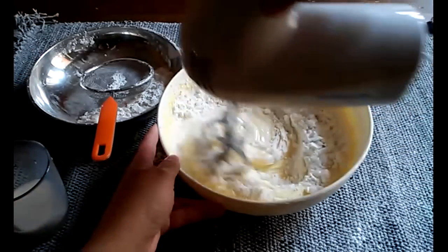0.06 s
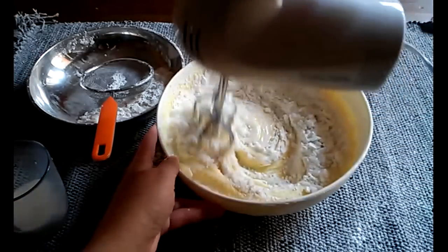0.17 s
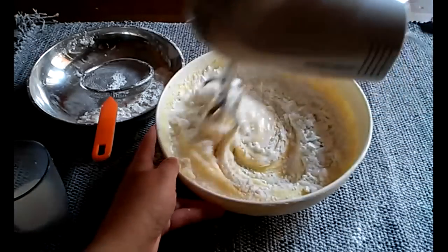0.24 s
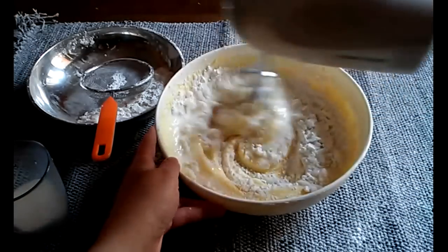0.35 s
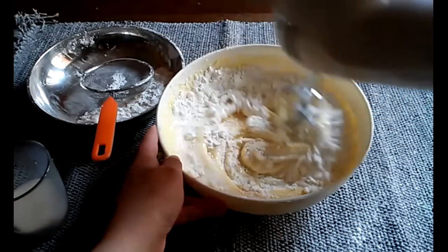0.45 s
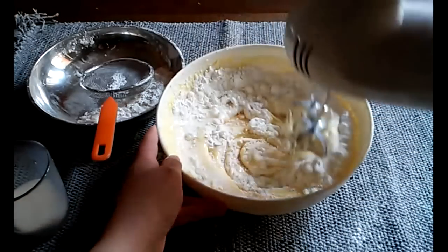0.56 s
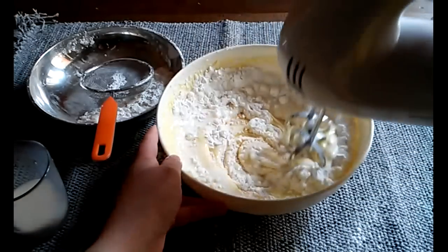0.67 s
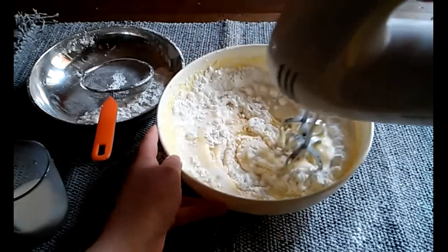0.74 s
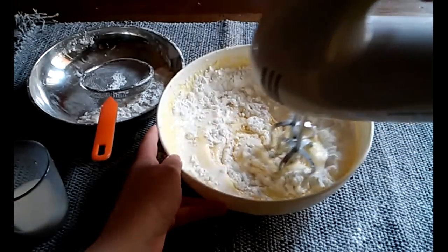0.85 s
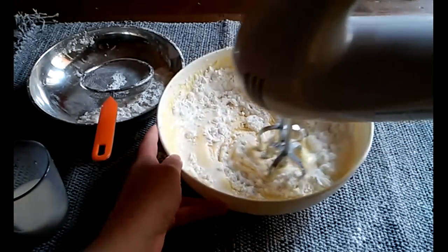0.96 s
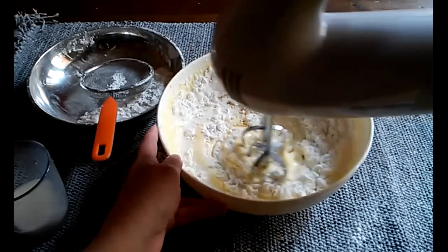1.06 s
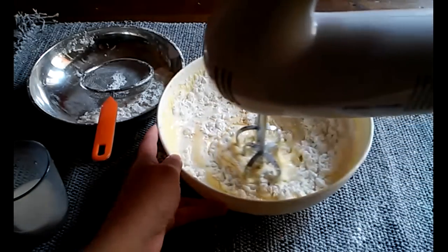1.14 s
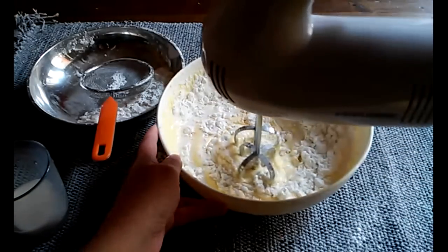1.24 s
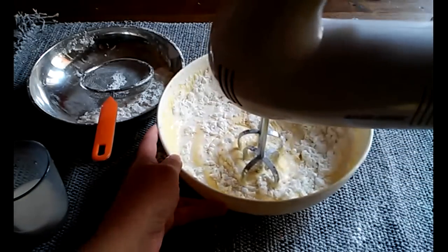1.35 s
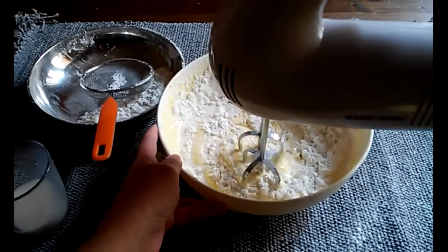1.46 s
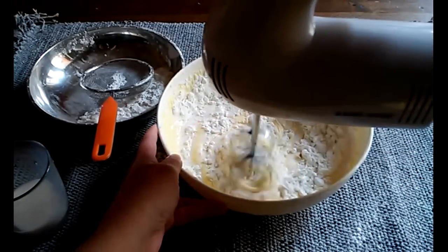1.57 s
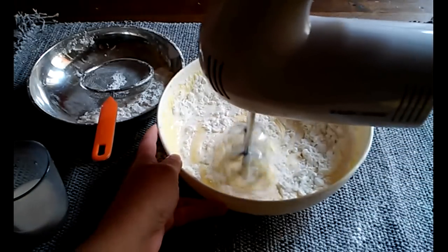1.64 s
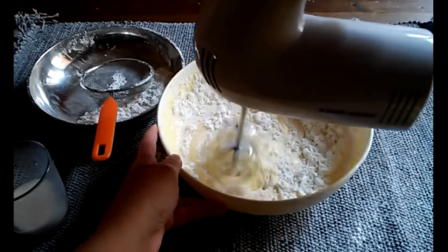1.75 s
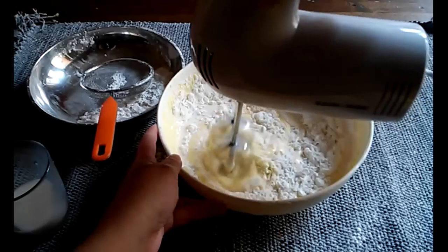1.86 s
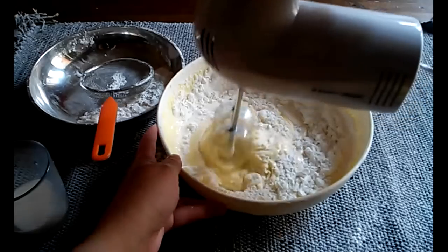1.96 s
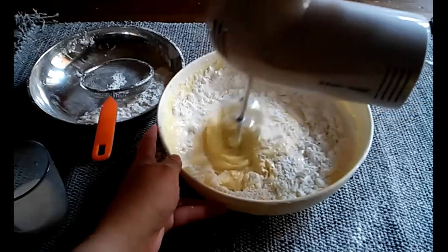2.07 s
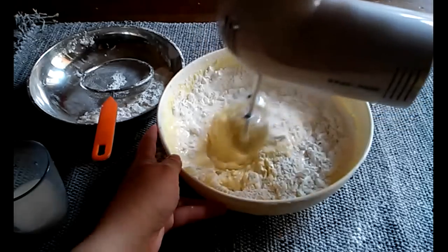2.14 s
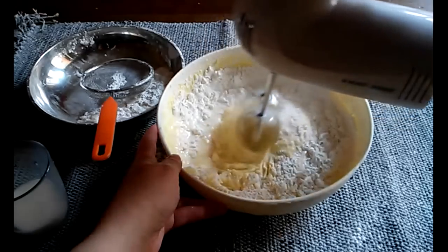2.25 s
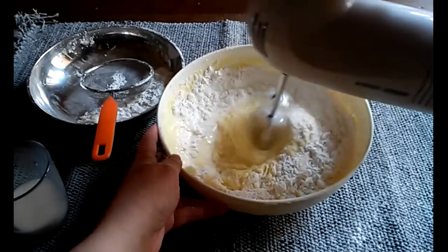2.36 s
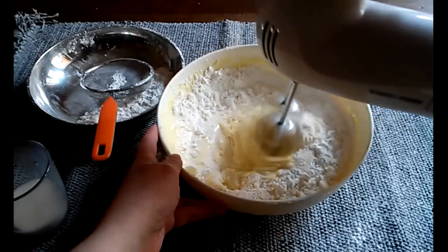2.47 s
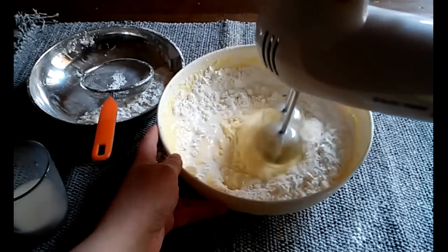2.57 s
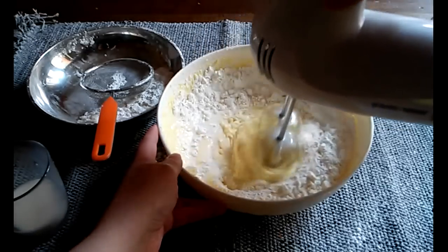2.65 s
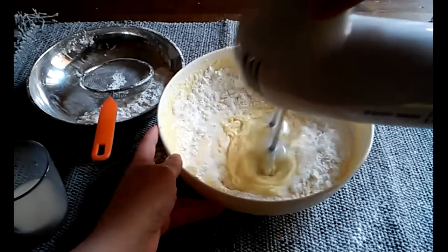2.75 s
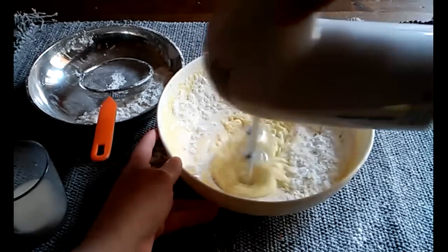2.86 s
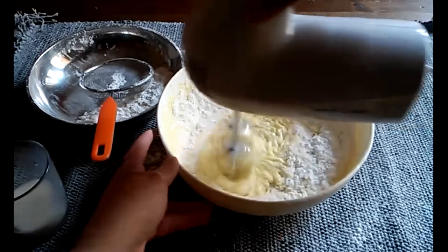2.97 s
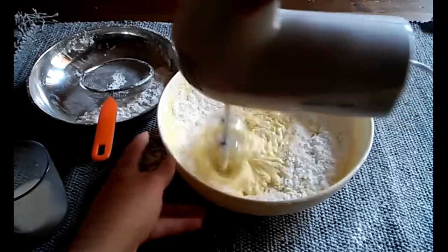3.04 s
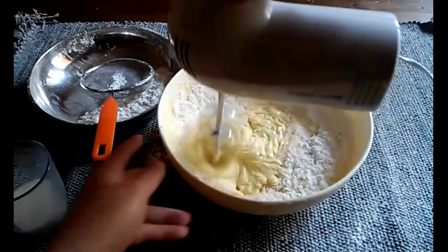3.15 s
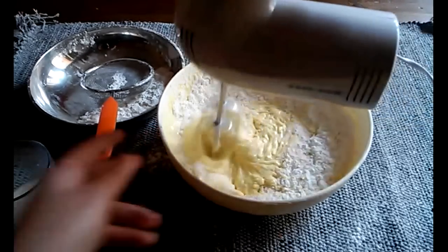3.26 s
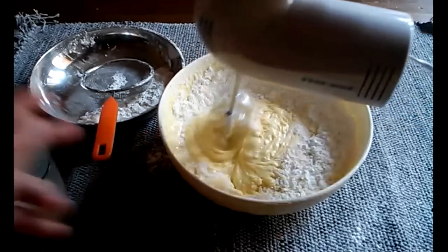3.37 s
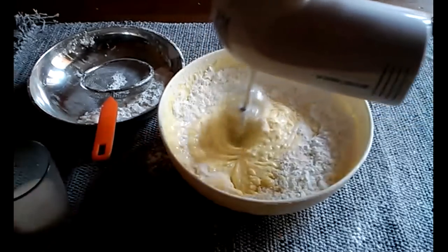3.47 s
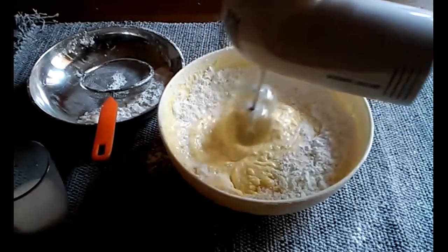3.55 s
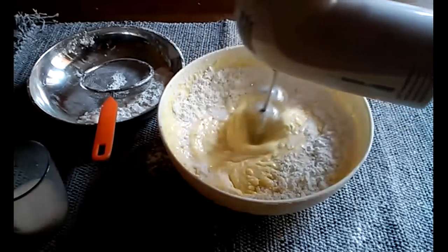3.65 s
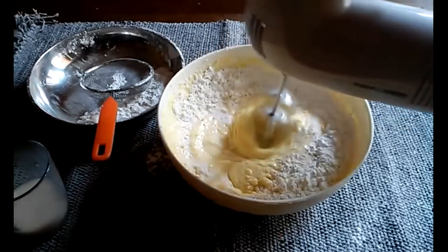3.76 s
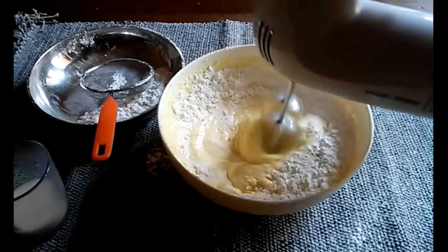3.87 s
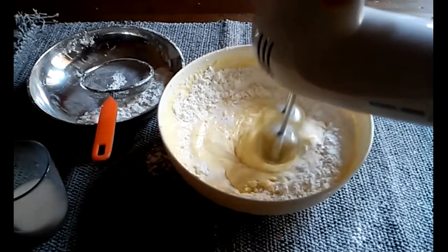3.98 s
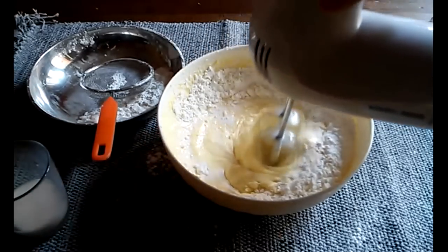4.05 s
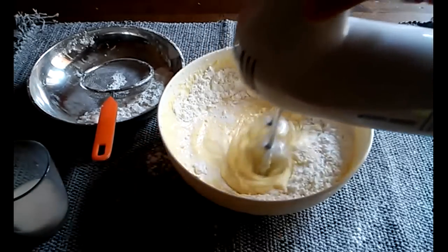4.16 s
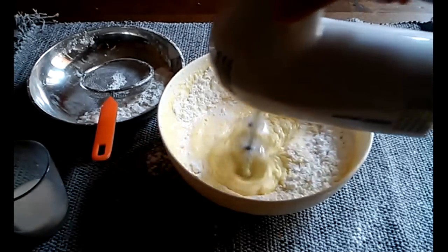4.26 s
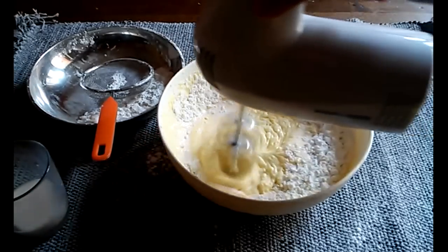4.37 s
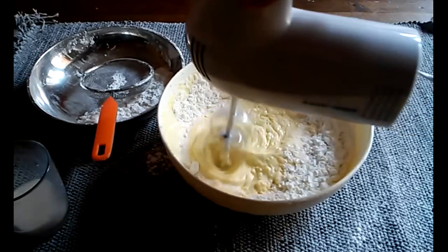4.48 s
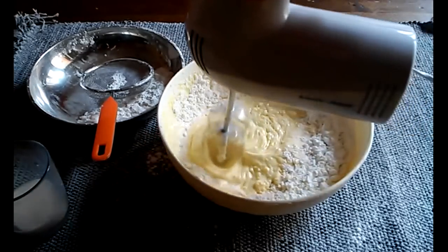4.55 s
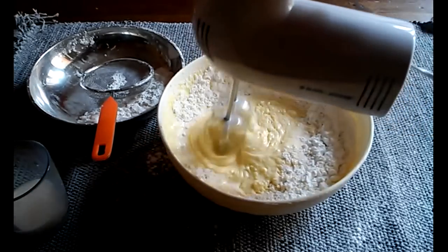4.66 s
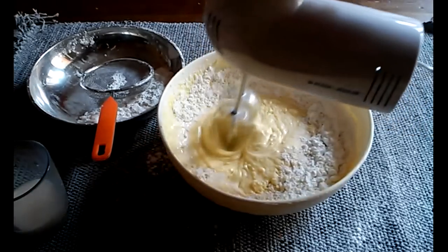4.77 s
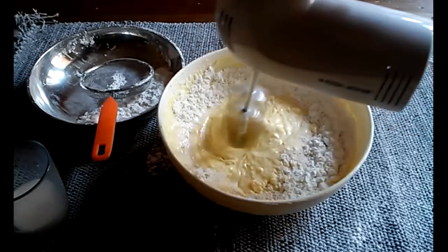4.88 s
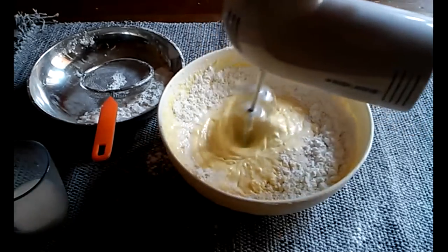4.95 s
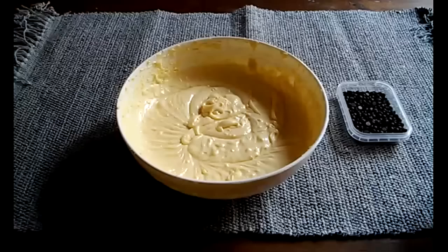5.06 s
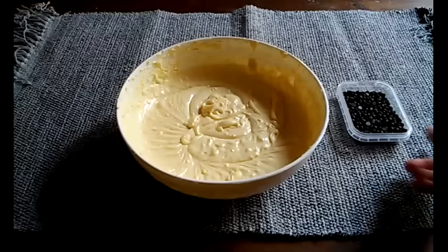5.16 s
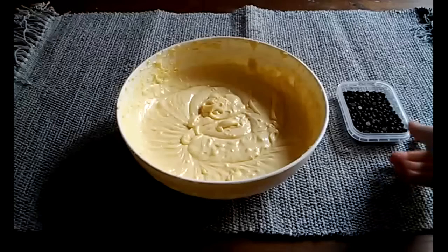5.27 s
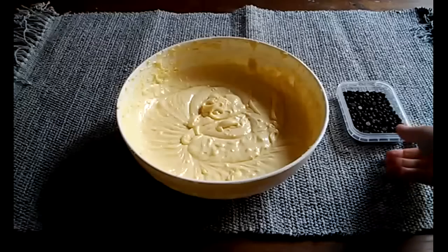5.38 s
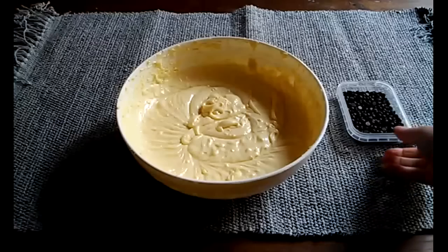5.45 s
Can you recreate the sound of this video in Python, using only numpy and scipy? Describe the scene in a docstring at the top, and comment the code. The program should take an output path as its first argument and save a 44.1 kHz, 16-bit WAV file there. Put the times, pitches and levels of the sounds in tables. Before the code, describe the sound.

A quiet home kitchen with a very faint hum and tiny rustles. A hard plastic switch click, a quick rattle of gear clacks, and a hand mixer spins up within half a second to a throbbing electric whine with bright fan hiss and gear rattle. The pitch sags and recovers in the batter; midway the beaters knock rapidly on the bowl. It is cut off abruptly, leaving quiet room tone. Close, dry microphone.

```python
"""Faint rustles and a far hum in a quiet kitchen, then the click of a switch: a hand mixer spins up in thick batter.
Its mains motor whines on the rotor slots, throbbing with the current; one shaft speed also drives
shaft tones, fan hiss and gear rattle, which are coloured noise. Struck modes make the switch, the gear clacks
and the beaters' knocks on the bowl. The mixer is cut off in a quick fade; the kitchen stays."""
import sys
import numpy as np
from scipy import signal
from scipy.fft import rfft, irfft, next_fast_len
from scipy.io import wavfile
from scipy.ndimage import uniform_filter1d

SR = 44100
rng = np.random.default_rng(int(sys.argv[2]) if len(sys.argv) > 2 else 0)


def to_wav(s):
    """Save 16-bit WAV."""
    ch = np.atleast_2d(s).T  # columns
    pcm = np.round(np.clip(ch, -1, 1) * 32767)  # PCM
    wavfile.write(sys.argv[1], SR, pcm.astype(np.int16))


N = 243315
T = np.arange(N) / SR  # s

# Mixer levels before the casing, as it is led round the bowl.
# Each row: time in seconds, slot whine in dB, sharpness of its throb (no unit),
# lower fan hiss in dB at the reference speed, gear rattle in dB.
MIXER_LEVELS = [(1.6, -13.5, 1.4, -22, -29), (1.69, -20.5, 2.2, -36, -27.5),
                (1.8, -15.5, 0.62, -31.5, -28.5), (1.9, -18, 1.2, -29.5, -30.5), (2.0, -17, 1.6, -26, -26),
                (2.3, -15.5, 1.2, -24, -27), (2.62, -17.5, 1.15, -27, -25.5),
                (2.9, -18.5, 1.5, -24.5, -25.5), (3.1, -14.5, 1.1, -22, -25), (3.55, -17, 1.25, -24.5, -25),
                (3.78, -14.5, 1.3, -25, -24.5), (3.95, -15, 1.9, -27, -25), (4.25, -21, 1.0, -24, -23.5),
                (4.42, -17, 1.1, -23.5, -23), (4.62, -17.5, 2.1, -22.5, -23.5),
                (4.78, -21.5, 3, -23, -23.5), (5.08, -27, 2.3, -23, -24)]
REFERENCE_SPEED_HZ = 210
NOISE_FULL_S, NOISE_RISE_DB_PER_S = 1.6, 246


def motor():
    """Whine, shaft tones, fan, gears and shaking bowl all follow one shaft."""
    speed, spun_up = shaft_speed()
    speed_db = 20 * np.log10(speed / REFERENCE_SPEED_HZ)
    turns = np.cumsum(speed * (1 + .0004 * drift(.03))) / SR
    whine_db, sharpness, lower_hiss_db, rattle_db = columns(MIXER_LEVELS)
    start_db = rising(NOISE_FULL_S, NOISE_RISE_DB_PER_S)
    tones = slot_whine(speed, turns, whine_db, sharpness) + whistle(turns)
    tones = tones + shaft_tones(speed, turns, speed_db) * spun_up ** 2.6
    air_and_gears = fan(speed, speed_db, lower_hiss_db, start_db) + gears(speed, rattle_db + start_db)
    running = np.clip((T - 1.524) / .02, 0, 1)
    return running * (np.sqrt(2) * tones + .53 * casing(air_and_gears, flat=1.492) + bowl_shake(speed))


# Speed the shaft strives for, sagging and recovering with the load of the batter.
# Each row: time in seconds, speed in turns per second (Hz).
LOADED_SPEED = [(1.76, 204.2), (1.88, 198.5), (1.99, 199.8), (2.1, 205), (2.21, 205.2), (2.5, 197),
                (2.62, 199), (2.8, 205.8), (3.1, 208.7), (3.4, 214.4), (3.52, 214.6), (3.78, 207.8),
                (3.92, 206.3), (4.06, 208.4), (4.3, 213.8), (4.62, 217.8), (4.85, 221.5), (5.08, 219.3)]
ON_S, SPIN_UP_S = 1.505, .19  # start, time constant


def shaft_speed():
    """The rotor nears the loaded speed exponentially; returns turns per second and share spun up."""
    spun_up = 1 - np.exp(-np.maximum(T - ON_S, .001) / SPIN_UP_S)
    speed = uniform_filter1d(columns(LOADED_SPEED)[0], size=2500) * spun_up
    return speed, spun_up


# How well the casing radiates the whine as it climbs.
# Each row: whine pitch in Hz, gain in dB.
WHINE_RADIATED = [(300, -36.5), (850, -19.5), (1030, -3.5), (1200, -4.5), (1400, -3.5), (1610, -17),
                  (1720, -4.5), (1900, 0)]
# Resonances that overtones of the whine sweep through.
# Each row: multiple of the slot pitch, centre in Hz, width in Hz, level in dB.
OVERTONE_PEAKS = [(2, 1680, 450, -26.5), (2, 2703, 360, -21), (2, 3200, 660, -40), (3, 6400, 810, -21)]
SLOTS = 12
MAINS_THROB_HZ, THROB_PEAK_S = 99.93, .0011


def slot_whine(speed, turns, level_db, sharpness):
    """Rotor slots passing the poles whine; magnetic pull peaks twice in every mains cycle."""
    pitch_hz = SLOTS * speed
    slot_phase = 2 * np.pi * SLOTS * turns
    pull = np.cos(2 * np.pi * MAINS_THROB_HZ * (T - THROB_PEAK_S))
    throb = np.exp(sharpness * pull) / np.sqrt(np.i0(2 * sharpness))  # Bessel term keeps rms at 1
    ripple_rad = -.6 * pull  # each pull speeds the rotor: pitch rises through every throb
    jitter_rad = .08 * drift(.004)
    radiated_db = np.interp(pitch_hz, *np.transpose(WHINE_RADIATED))
    whine_gain = gain_of(level_db + radiated_db - 3.5 + 1.2 * drift(.02))
    whine = whine_gain * throb * np.cos(slot_phase + ripple_rad + jitter_rad)
    overtones = np.zeros(N)
    for multiple, hz, width_hz, db in OVERTONE_PEAKS:
        swell = gain_of(db) * peak(multiple * pitch_hz, hz, width_hz, order=4)
        overtones += swell * np.cos(multiple * slot_phase)
    whine = casing(whine + throb ** .5 * overtones, flat=.54)
    # echo off the table: its path changes as the mixer moves, tilting the throbbing partials
    echo_s = .004 + .0002 * drift(.3)
    return whine + .35 * np.interp(T - echo_s, T, whine)


# Harmonics of the shaft that sound. Each entry: multiple of the shaft speed.
SHAFT_ORDERS = [1, 2, 3, 4, 5, 6, 9]
# Resonances that shaft tones swell in as the speed carries them through.
# Each row: centre in Hz, width in Hz, level in dB.
SHAFT_PEAKS = [(199, 50, -41.5), (376, 42, -35), (431.7, 14, -38.5), (614, 70, -45), (695, 35, -36),
               (779, 14, -45.5), (838, 23, -41.5), (990, 40, -38.5), (1059, 26, -40), (1110, 20, -39),
               (1184, 50, -35.5), (1233, 30, -37.5), (1760, 70, -34), (1888, 80, -35.5)]
SHAFT_FLOOR_DB = -50  # at the reference speed


def shaft_tones(speed, turns, speed_db):
    """Unbalance sounds at the shaft speed; higher orders flutter more, at random."""
    tones = np.zeros(N)
    for order in SHAFT_ORDERS:
        level = gain_of(SHAFT_FLOOR_DB + speed_db)
        for hz, width_hz, db in SHAFT_PEAKS:
            level = level + gain_of(db) * peak(order * speed, hz, width_hz, order=4)
        flutter_db = (1.5 if order == 1 else 3.) * drift(.02)
        tones += level * gain_of(flutter_db) * np.cos(2 * np.pi * (order * turns + rng.random()))
    return tones


# A fuzzy whistle comes and goes. Each row: time in seconds, level in dB.
WHISTLE = [(2.3, -53), (2.72, -28), (3.0, -32), (4.1, -42), (4.3, -30), (4.7, -34), (4.95, -36),
           (5.08, -43)]
WHISTLE_ORDER = 26


def whistle(turns):
    """Random amplitude blurs a shaft harmonic into a narrow band."""
    return gain_of(columns(WHISTLE)[0]) * drift(.002) * np.cos(2 * np.pi * WHISTLE_ORDER * turns)


# Colour of the fan hiss, before levelling. Each row: frequency in Hz, relative density in dB per Hz.
HISS_COLOUR = [(1650, -42), (2800, -6), (3430, -5.5), (3750, -3), (4240, -9.5), (4630, -6), (6110, -2.5),
               (7490, 5), (10000, -9), (14400, -21.5), (16000, -20.5)]
HISS_DB = -20.5  # upper band, before the casing, at the reference speed
HISS_POWER, LOWER_HISS_POWER = 1.6, 2.04  # power of the speed that each band follows


def fan(speed, speed_db, lower_hiss_db, start_db):
    """Air noise in two bands grows with the speed, its top opening last."""
    air = noise(HISS_COLOUR, 1.9, ticks=.18)
    lower = below(air, 5760)
    upper_hiss = gain_of(HISS_DB + HISS_POWER * speed_db) * evened(air - lower)
    lower_hiss = gain_of(lower_hiss_db + LOWER_HISS_POWER * speed_db) * evened(lower)
    hiss = gain_of(start_db) * (upper_hiss + lower_hiss)
    closed = np.clip(.9 - (speed / 200) ** 2.1, 0, .7)
    return hiss - (hiss - below(hiss, 9500)) * closed


# Colour of the gear rattle, before levelling. Each row: frequency in Hz, relative density in dB per Hz.
RATTLE_COLOUR = [(12, -55), (20, -31), (119, -22), (211, -10), (256, -10), (549, -8), (637, -6.5),
                 (755, -11.5), (1130, -4), (2140, -3.5), (2480, -0.5), (3200, -48), (4160, -45.5),
                 (7040, -120)]


def gears(speed, level_db):
    """Gear rattle is patchy ticking noise, thin while slow: its low part grows with speed."""
    rattle = noise(RATTLE_COLOUR, 2.5, ticks=.17)
    thinned = np.clip(1.2 - (speed / 170) ** 3., 0, .9)
    rattle = rattle - below(rattle, 650) * thinned
    return gain_of(level_db + .34 * drift(.024)) * rattle


# Modes of the plastic shell. Each row: frequency in Hz, width in Hz, gain in dB.
CASING_MODES = [(1152, 52, -1.5), (1486, 95, 1.5), (1740, 120, 0), (1867, 40, 5), (2280, 220, -15.5),
                (2671, 170, 1), (3254, 100, 0.5), (3690, 87, -10), (4575, 260, 4), (5610, 98, -1.5),
                (6300, 530, -5.5)]


def casing(x, flat):
    """The plastic shell lifts its modes over a flat share."""
    size = next_fast_len(N)
    hz = np.fft.rfftfreq(size, 1 / SR)
    gain = flat + sum(gain_of(db) * peak(hz, f, width_hz) for f, width_hz, db in CASING_MODES)
    return irfft(rfft(x, size) * gain, size)[:N]


# Colour of the shaking bowl, before levelling. Each row: frequency in Hz, relative density in dB per Hz.
SHAKE_COLOUR = [(30, -21.5), (60, -10.5), (85, -10.5), (115, 4), (150, 6.5), (220, -24)]
# Beaters hit the bowl; the first row is a clack as the gears take up slack.
# Each row: time in seconds, peak in dB.
KNOCKS = [(1.591, -29.5), (2.931, -21), (2.959, -24), (2.99, -23.5), (3.023, -14), (3.054, -18.5),
          (3.078, -20.5), (3.111, -23.5), (3.134, -20), (3.163, -18), (3.188, -24), (3.234, -19),
          (3.249, -31.5)]
SHAKE_DB, SHAKE_PEAK_HZ, SHAKE_WIDTH_HZ, SHAKE_PEAK_DB = -66.5, 143, 40, -36.5
KNOCK_SHAKE_DB, KNOCK_SHAKE_S = -34.5, .06  # relative to the knock, half-width to 1/e


def bowl_shake(speed):
    """The bowl shakes on the table: always a little, more at its resonance and under each row of KNOCKS."""
    shaking = gain_of(SHAKE_DB) + gain_of(SHAKE_PEAK_DB) * peak(speed, SHAKE_PEAK_HZ, SHAKE_WIDTH_HZ)
    for s, db in KNOCKS:
        shaking = shaking + gain_of(db + KNOCK_SHAKE_DB) * np.exp(-((T - s) / KNOCK_SHAKE_S) ** 2)
    return shaking * gain_of(2.2 * drift(.014)) * noise(SHAKE_COLOUR, 2.0)


# Modes rung by the knocks and the first clack.
# Each row: frequency in Hz, relative level in dB, 60 dB decay in seconds.
BOWL_MODES = [(107, -11, 0.23), (306, -5.5, .06), (560, -3, 0.12), (617, 3.5, 0.066), (1050, -7.5, .08),
              (1250, -1.5, 0.089), (1404, -1.5, 0.1)]


def knocks_and_first_clack():
    """A gear clack, then the beaters striking the bowl, ring the same low modes."""
    return struck(KNOCKS, BOWL_MODES, rise_s=.00079, crack=.27)


# Clicks of the switch. Each row: time in seconds, peak in dB.
SWITCH_CLICKS = [(1.4975, -44.5), (1.5008, -23.5), (1.5385, -31.5), (1.5412, -9)]
# The gears take up their slack. Each row: time in seconds, peak in dB.
GEAR_CLACKS = [(1.5928, -20), (1.6054, -16.5), (1.6224, -20.5)]
# Modes rung by both. Each row: frequency in Hz, relative level in dB, 60 dB decay in seconds.
SWITCH_MODES = [(1130, -19.5, 0.022), (1750, -19, .015), (2150, -16.5, 0.018), (2817, -13.5, 0.019),
                (4730, -7, .01), (6280, 2, .01), (6970, 6, 0.013), (7720, 8, 0.01), (9200, 7.5, 0.009),
                (9800, 3, 0.0087), (11550, -6, .006), (14050, -14.5, .005)]


def switch_and_clacks():
    """Switch and gear impacts ring the same modes and reflect off the walls."""
    clicks = struck(SWITCH_CLICKS, SWITCH_MODES, rise_s=.000674, crack=.83)
    clacks = struck(GEAR_CLACKS, SWITCH_MODES, rise_s=.0008, crack=1.4)
    dry_impacts = clicks + clacks
    return dry_impacts + gain_of(-7.0) * walls(dry_impacts)


def walls(x):
    """A short room tail: noise decaying 60 dB in 0.2 s."""
    t = np.arange(SR // 4) / SR
    tail = rng.standard_normal(len(t)) * gain_of(-60 * t / .2) * (t > .003)
    return signal.oaconvolve(x, tail / np.linalg.norm(tail))[:N]


# Faint bright rustles. Each row: time in seconds, level in dB, fade in dB per second.
RUSTLES = [(.42, -81, 16), (1.24, -82, 24), (5.1, -82.5, 27)]
# Faint duller rustles. Each row: time in seconds, centre in Hz, half-width to 1/e in seconds, level in dB.
SCUFFS = [(.05, 2220, .05, -78), (.45, 1580, .07, -84)]
RUSTLE_RISE_DB_PER_S, RUSTLE_FLOOR_DB = 300, -90.5


def rustling():
    """Bright bursts over a constant floor, and duller narrow-band noise swells."""
    level = gain_of(RUSTLE_FLOOR_DB)
    for s, db, fade_db_per_s in RUSTLES:
        level = level + gain_of(db + rising(s, RUSTLE_RISE_DB_PER_S) - fade_db_per_s * np.maximum(T - s, 0))
    colour = [(5500, -32), (6500, -3.5), (7500, 1), (9000, -11), (11000, -32)]  # (Hz, dB per Hz)
    out = level * noise(colour, 3.5)
    for s, hz, length_s, db in SCUFFS:
        swell = gain_of(db) * np.exp(-((T - s) / length_s) ** 2)
        out += swell * drift(.002) * np.cos(2 * np.pi * hz * T)
    return out


# Colour of the room tone, before levelling. Each row: frequency in Hz, relative density in dB per Hz.
ROOM_COLOUR = [(12, -28.5), (20, -5), (32, -7.5), (123, -2.5), (270, -27), (301, -4.5), (328, -13.5),
               (590, -14.5), (642, -14.5), (1530, -18), (5380, -21), (6910, -18.5), (16000, -21)]
# An appliance hums far off. Each row: frequency in Hz, level in dB.
HUM = [(118.4, -93.5), (215.3, -91.5), (301.5, -82.5), (602.9, -95.5)]
ROOM_DB = -75


def kitchen():
    """Room tone is coloured noise, the far hum wavering tones; rustles lie over both."""
    room = gain_of(ROOM_DB + 1.2 * drift(.05)) * noise(ROOM_COLOUR, 1.3)
    hum = sum(gain_of(db + 2.5 * drift(.06)) * np.sqrt(2) * np.cos(2 * np.pi * hz * T) for hz, db in HUM)
    return room + hum + rustling()


def gain_of(db):
    """Amplitude factor of a level in dB."""
    return 10 ** (np.asarray(db) / 20)


def evened(x):
    """Scales to rms 1."""
    return x / np.sqrt(np.mean(x ** 2) + 1e-20)


def columns(rows):
    """Reads every column of a curve table at each sample."""
    s, *values = np.transpose(rows)
    return [np.interp(T, s, v) for v in values]


def rising(full_s, db_per_s):
    """dB that climb to zero and stay there."""
    return db_per_s * np.minimum(T - full_s, 0)


def peak(hz, centre_hz, width_hz, order=2):
    """Gain of a resonance, 1 at its centre."""
    return 1 / (1 + (2 * (hz - centre_hz) / width_hz) ** order)


def below(x, hz):
    """The part of a sound under a frequency, without phase shift."""
    return signal.sosfiltfilt(signal.butter(4, hz, fs=SR, output="sos"), x)


def drift(seconds):
    """Random wander of rms 1: white noise averaged twice over the given time."""
    size = max(int(seconds * SR), 1)
    return evened(uniform_filter1d(uniform_filter1d(rng.standard_normal(N), size), size))


def noise(colour, patchy_db, ticks=0.):
    """Noise of rms 1 with small ticks mixed in, given a colour and drifting patches."""
    tick_on = rng.random(N) < 400 / SR  # 400 per second on average
    tick_size = gain_of(3. * np.minimum(rng.exponential(1, N), 3))
    tick = tick_on * tick_size * rng.choice([-1, 1], N)
    source = rng.standard_normal(N) + ticks * evened(tick)
    hz, _, z = signal.stft(source, SR, nperseg=1024, noverlap=768)
    patches = evened(uniform_filter1d(uniform_filter1d(rng.standard_normal(z.shape), 5, 0), 40, 1))
    f, db = np.transpose(colour)
    colour_db = np.interp(np.log(hz + 1), np.log(f), db)[:, None] + patchy_db * patches
    return evened(signal.istft(z * gain_of(colour_db), SR, nperseg=1024, noverlap=768)[1][:N])


def struck(events, modes, rise_s, crack):
    """Each blow is a dry crack of noise plus modes rung with its own strengths and phases."""
    out, t = np.zeros(N), np.arange(SR // 4) / SR
    hz, db, t60_s = np.transpose(modes)[:, :, None]
    chance = rng.random((len(events), 2, len(modes), 1))
    cracks = rng.standard_normal((len(events), len(t))) * gain_of(-60 * t / .009)
    for (s, peak_db), (phase, size), burst in zip(events, chance, cracks):
        mode_gain = gain_of(db - 60 * t / t60_s + 6.9 * (size - .5))
        ring = (mode_gain * np.sin(2 * np.pi * (hz * t + phase))).sum(0)
        blow = (ring + crack * burst) * (1 - np.exp(-t / rise_s))
        at = round(s * SR)
        out[at:at + len(t)] += gain_of(peak_db) * blow / abs(blow).max()
    return out


CUT_S, CUT_DB_PER_S = 5.074, 2801.5


def scene():
    """The mixer sounds until it is cut off in a quick fade; the kitchen goes on."""
    mixer = motor() + knocks_and_first_clack() + switch_and_clacks()
    cut = gain_of(-CUT_DB_PER_S * np.maximum(T - CUT_S, 0))
    return (mixer * cut + kitchen())[None]


OFFSET, EDGE_HZ = -.00029, 15750


def record(dry):
    """A small constant offset, then a lowpass band limit."""
    band_limit = signal.firwin(511, EDGE_HZ, window=("kaiser", 9), fs=SR)
    return signal.oaconvolve(dry + OFFSET, band_limit[None], "same")


dry = scene()
out = record(dry)
to_wav(out)
```